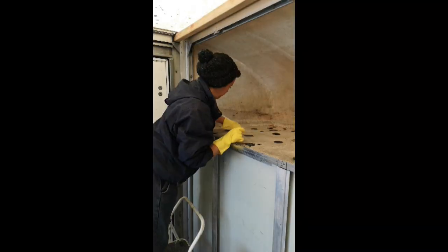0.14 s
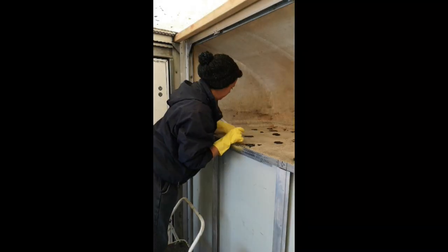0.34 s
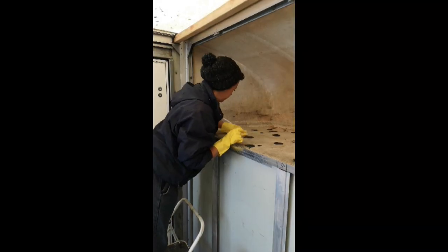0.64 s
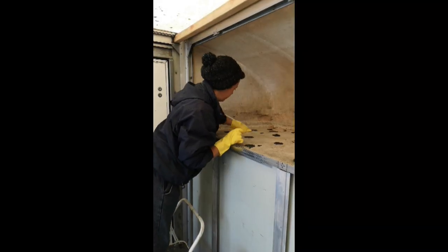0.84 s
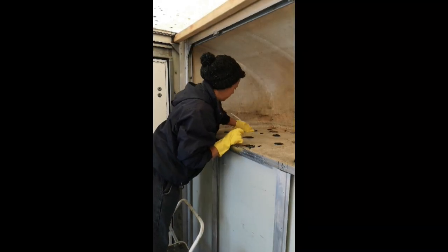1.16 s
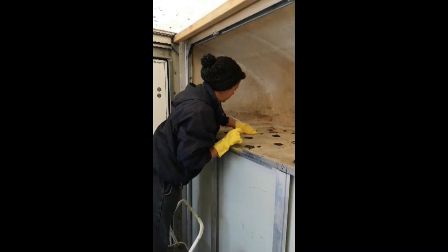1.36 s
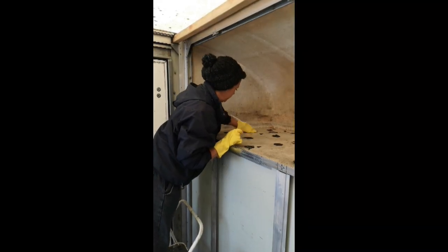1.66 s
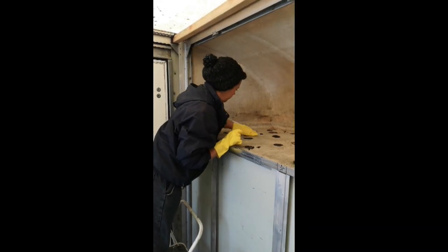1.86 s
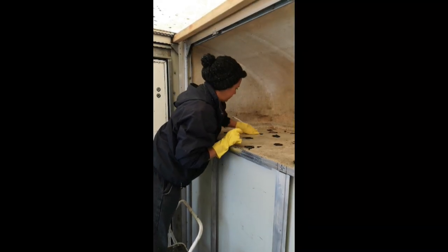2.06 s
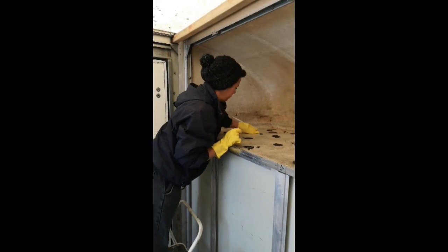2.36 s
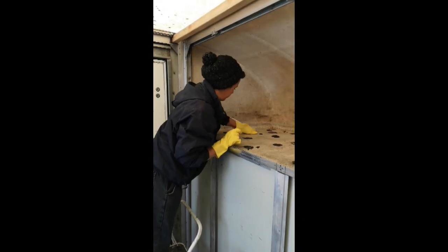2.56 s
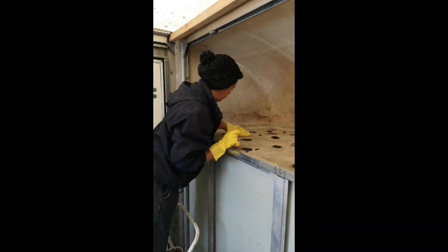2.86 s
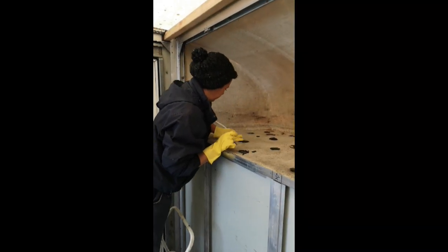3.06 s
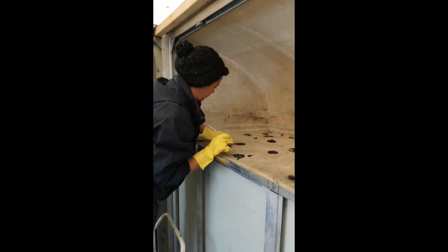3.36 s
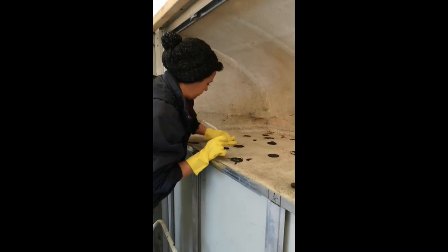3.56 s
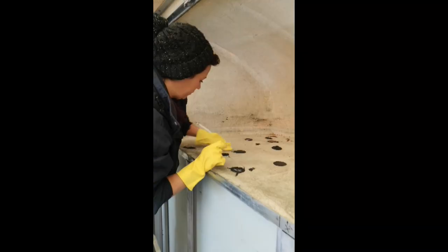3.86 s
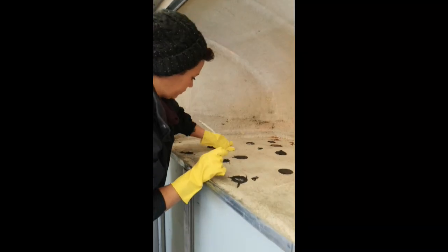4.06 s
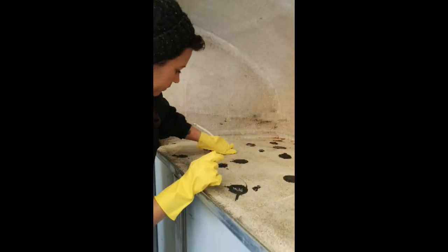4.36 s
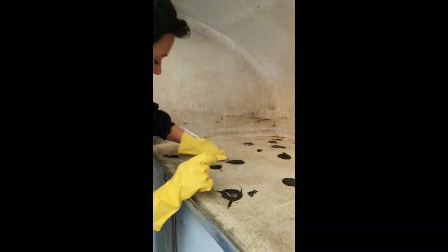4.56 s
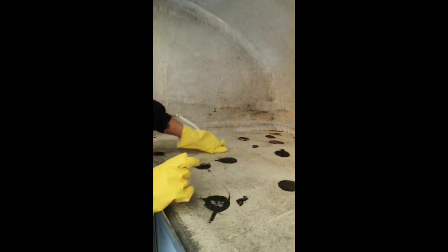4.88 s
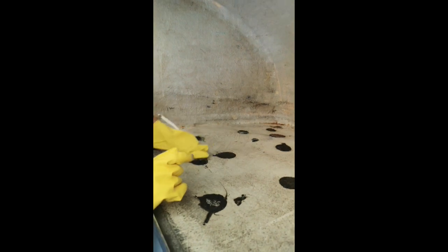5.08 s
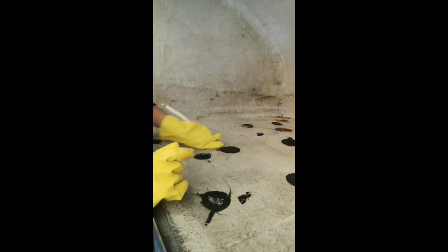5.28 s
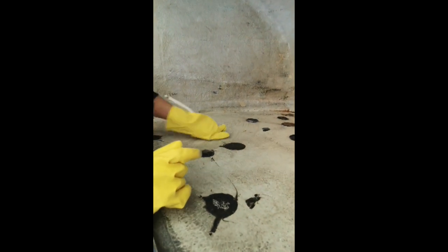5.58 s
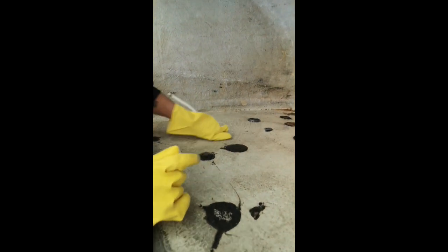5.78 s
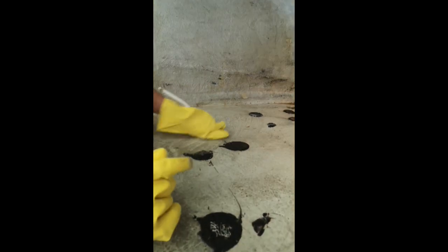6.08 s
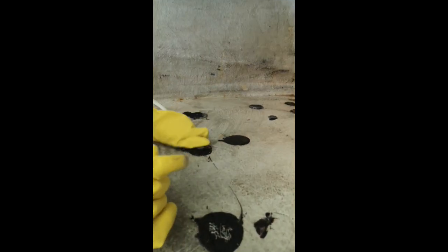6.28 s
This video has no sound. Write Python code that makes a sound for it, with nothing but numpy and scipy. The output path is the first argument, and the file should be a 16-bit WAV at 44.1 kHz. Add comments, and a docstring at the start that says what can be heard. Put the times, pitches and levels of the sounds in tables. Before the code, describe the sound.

Near-silence for about 0.2 s, then brisk scrubbing opens suddenly and runs unbroken to about 6.4 s. A small stiff brush goes back and forth on a hollow fibreglass deck, about seven strokes a second, pushes slightly heavier than pulls, with tiny dips at each turn. The hiss is bright and grainy, with a ringing bristle edge high up and a duller grit rasp below, less gritty around 1.3 s, rougher again from 3 s. The deck booms softly throughout. Coarse scuffs or bumps come near 2.8, 3.5, 4.0 and 4.85 s, the strongest at 5.45 s, another at 6.05 s. From 3 s the handheld microphone moves closer, adding nasal panel tone; the bristles shift from right towards centre. Low handling rumble swells after 4.9 s, jolting around 5.5-5.7 s. Close walls give very short reflections over faint outdoor air.

```python
"""Brush scrubbing a van deck

A gloved hand scrubs a hollow fibreglass deck with a small stiff brush, about seven strokes a second.
Random bristle flicks ring high, grit rasps below, and now and then the brush scuffs harder.
Shaped noise makes the deck's boom, thuds and groans; short decaying echoes make the close walls.
A hand-held camera moves in, with low handling rumble over steady outdoor air.
"""
import sys
import numpy as np
from scipy import signal
from scipy.fft import rfft, irfft, next_fast_len
from scipy.io import wavfile
from scipy.ndimage import uniform_filter1d, map_coordinates

SR = 44100
rng = np.random.default_rng(int(sys.argv[2]) if len(sys.argv) > 2 else 0)


def wav_record(signal):
    """Record a signal, one row per channel, as 16-bit PCM in the file named by sys.argv[1]."""
    frames = np.transpose(np.atleast_2d(signal))
    bounded = np.clip(frames, -1, 1)
    # unit amplitude maps onto the largest positive 16-bit level
    quanta = np.round(bounded * 32767).astype(np.int16)
    wavfile.write(sys.argv[1], SR, quanta)


N = 283695


def amp(db):
    """Decibels to gain."""
    return 10 ** (np.asarray(db) / 20)


def unit(x):
    """Scaled to rms 1."""
    return x / np.sqrt(np.mean(x ** 2) + 1e-20)


def seconds():
    """Time of each sample."""
    return np.arange(N) / SR


def along(points, hz):
    """(frequency, value) points read on a log frequency axis."""
    point_hz, value = np.transpose(points)
    return np.interp(np.log(hz + 1), np.log(point_hz + 1), value)


def curve(rows):
    """(time, value) rows as one value per sample."""
    return np.interp(seconds(), *np.transpose(rows))


def humps(rows):
    """Sum of Gaussian swells; gain falls to exp(-2) one width from the middle."""
    t_s = seconds()
    return sum(amp(db) * np.exp(-2 * ((t_s - middle_s) / width_s) ** 2) for middle_s, width_s, db in rows)


def wobble(knots_per_s):
    """Smooth random curve through normally distributed knots."""
    knots = rng.standard_normal(int(N * knots_per_s / SR) + 4)
    return map_coordinates(knots, [np.arange(N) * knots_per_s / SR])


def filtered(x, response):
    """x times a response of frequency."""
    size = next_fast_len(N + SR // 2)
    spectrum = rfft(x, size) * response(np.fft.rfftfreq(size, 1 / SR))
    return irfft(spectrum, size)[..., :N]


def ring(x, spectrum, size=2048):
    """x through a causal, minimum-phase body with this spectrum, at rms 1."""
    log_gain = np.log(amp(along(spectrum, np.fft.rfftfreq(size, 1 / SR))))
    cepstrum = irfft(log_gain)
    fold = 1 + np.sign(size / 2 - np.arange(size))
    fold[0] = 1
    impulse = irfft(np.exp(rfft(cepstrum * fold)))
    return unit(signal.fftconvolve(x, impulse[None], axes=1)[:, :N])


# Left-right correlation of broad noise: (frequency [Hz], correlation [0-1])
STEREO_LIKENESS = [(60, .99), (130, 0.98), (290, .85), (640, 0.92), (1400, 0.22), (4000, 0.46),
                   (15000, .05)]


def rush(spectrum):
    """Stereo noise of rms 1: mid and side shares set the correlation, nearly mono in the bass."""
    def mid_side_gain(hz):
        angle = np.arccos(along(STEREO_LIKENESS, hz)) / 2
        return amp(along(spectrum, hz)) * np.array([np.cos(angle), np.sin(angle)])

    mid, side = filtered(rng.standard_normal((2, N)), mid_side_gain)
    return unit(np.array([mid + side, mid - side]))


def flicks(rate_hz, alike):
    """Random stereo impulses of steady mean power; a share `alike` is forced to the same sign."""
    chance = rate_hz / SR
    signs = rng.choice([-1, 1], (2, N))
    signs = np.where(rng.random(N) < alike, signs[0], signs)
    return (rng.random(N) < chance) * signs / np.sqrt(chance)


def patchy(x, depth_db):
    """Slow random hills in the spectrum, a few hundred Hz wide, as the contact patch moves; rms 1."""
    bins = signal.stft(x, nperseg=512)[2]
    field = rng.standard_normal(bins.shape[1:])
    field = uniform_filter1d(uniform_filter1d(field, size=4, axis=0), size=12, axis=1)
    return unit(signal.istft(bins * amp(depth_db * unit(field)), nperseg=512)[1][:, :N])


# Outdoor air spectrum: (frequency [Hz], relative level [dB])
AIR_SPECTRUM = [(30, -6), (150, -6.5), (300, -3), (600, -5.5), (760, -2.5), (900, 0.5), (1080, -5),
                (1400, -7), (2200, -11), (6000, -19), (15000, -42)]


def air():
    """Steady outdoor air: stationary shaped noise."""
    return amp(-48) * rush(AIR_SPECTRUM)


# Handling rumble: (time [s], level [dB])
HANDLING_LEVEL = [(.3, -39), (1.5, -38), (2.3, -42), (3.2, -40), (4.9, -31.5), (5.3, -33), (6.15, -29.5),
                  (6.43, -35)]
# Grip shifts on the camera: (middle [s], width [s], level [dB])
GRIP_JOLTS = [(5.535, .06, -23), (5.68, .035, -25)]
# Handling spectrum: (frequency [Hz], relative level [dB])
HANDLING_SPECTRUM = [(10, -13), (25, -4), (46, -3.5), (66, -6.5), (88, -8), (120, -16), (250, -37.5),
                     (800, -66)]


def handling():
    """Low noise of the hand on the camera, swelling briefly where the grip shifts."""
    return (amp(curve(HANDLING_LEVEL)) + humps(GRIP_JOLTS)) * rush(HANDLING_SPECTRUM)


# Body weight leaning on the deck: (middle [s], width [s], level [dB])
DECK_LEANS = [(.48, .14, -38), (1.09, .06, -43), (1.38, .09, -42), (1.99, .15, -42), (2.45, .15, -41),
              (3.52, .16, -37.5), (4.05, .14, -35.5), (4.87, .06, -40), (5.51, .1, -34), (6.09, .07, -37)]
# Hollow deck spectrum: (frequency [Hz], relative level [dB])
DECK_SPECTRUM = [(50, -43), (90, 1), (118, 1), (142, -6), (168, -4), (203, -17), (238, -9), (272, -19),
                 (308, -12.5), (430, -20), (700, -26.5), (1500, -26.5)]
BOOM_DB, BOOM_PUSH_DB, BOOM_DRIFT_DB = -42.5, .8, .8  # base, swing with the arm, slow chance


def deck_boom(swing):
    """The hollow deck booms unevenly, more under each push or lean."""
    level_db = BOOM_DB + BOOM_PUSH_DB * swing + BOOM_DRIFT_DB * wobble(5)
    uneven = unit(rush(DECK_SPECTRUM) * amp(0.88 * wobble(25)))
    return (amp(level_db) + humps(DECK_LEANS)) * uneven


# One row per back-and-forth of the arm: (push start [s], pull start [s])
ARM_STROKES = [(.04, .176), (.314, .49), (.65, .793), (.938, 1.076), (1.222, 1.376), (1.516, 1.653),
               (1.775, 1.925), (2.063, 2.235), (2.382, 2.56), (2.702, 2.881), (3.018, 3.173),
               (3.303, 3.462), (3.59, 3.733), (3.875, 4.034), (4.18, 4.319), (4.459, 4.607), (4.744, 4.879),
               (5.032, 5.182), (5.325, 5.495), (5.648, 5.783), (5.923, 6.076), (6.232, 6.38)]
# How hard the arm bears down: (time [s], relative level [dB])
ARM_EFFORT = [(.2, -26.5), (.4, -21.8), (1.4, -22.7), (2.5, -21.7), (3.65, -24), (4.3, -21.8), (5.1, -22),
              (5.45, -19), (5.8, -19.6), (6.3, -18.2)]
PUSH_DB, PULL_DB = 1.0, -1.1  # a push is heavier than a pull
PUSH_PEAK, PULL_PEAK = .51, .45  # share of the stroke before top speed
LAST_PULL_S = .14


def arm():
    """Brush speed 0-1, pressure dB and swing (+1 mid-push, -1 mid-pull): the hand stops at each turn."""
    t_s = seconds()
    start_s = np.ravel(ARM_STROKES)
    pushing = np.arange(len(start_s)) % 2 == 0
    length_s = np.append(np.diff(start_s), LAST_PULL_S)
    fastest_s = start_s + np.where(pushing, PUSH_PEAK, PULL_PEAK) * length_s

    # quarter-turns of phase: turn, top speed, turn, ...
    marks_s = np.append(np.column_stack([start_s, fastest_s]), start_s[-1] + length_s[-1])
    swing = np.sin(np.interp(t_s, marks_s, np.arange(len(marks_s)) * np.pi / 2))

    stroke_db = np.interp(fastest_s, *np.transpose(ARM_EFFORT)) + np.where(pushing, PUSH_DB, PULL_DB)
    stroke = np.clip(np.searchsorted(start_s, t_s) - 1, 0, None)
    press_db = uniform_filter1d(stroke_db[stroke], size=1300)
    return np.abs(swing), press_db, swing


# Bristle ring spectrum: (frequency [Hz], relative level [dB])
BRISTLE_SPECTRUM = [(1500, -53), (3500, -24), (6000, -15.5), (7000, -9), (7700, -4), (8170, -1.5),
                    (8700, -4), (9400, -9.5), (10500, -14), (12500, -21.5), (15800, -24)]
# Fine fizz spectrum: (frequency [Hz], relative level [dB])
FIZZ_SPECTRUM = [(2000, -32), (5000, -8), (9000, 0), (12000, 2), (15800, -.5)]


def bristles(speed, press_db, near):
    """Bristles flick free in tufts: speed gives more and louder ticks, and a fine fizz."""
    tufts = amp(1.55 * wobble(650) + .3 * wobble(130) + .6 * wobble(45))
    grip = np.tanh(1.44 * speed ** 1.82)  # friction levels off once the bristles skate
    ticks = ring(tufts * flicks(4000 + 8000 * speed, alike=.06), BRISTLE_SPECTRUM)
    ticks = ticks * (0.15 + 0.83 * grip)
    fizz = ring(tufts * flicks(12000, alike=.03), FIZZ_SPECTRUM) * amp(-12.5) * speed ** 2.0
    left_minus_right_db = -1.7 + 2.6 * near  # from the right to just past the middle
    return (ticks + fizz) * amp(press_db + 0.2 + np.outer([.5, -.5], left_minus_right_db))


# Grit scrape spectrum: (frequency [Hz], relative level [dB])
RASP_SPECTRUM = [(200, -17), (600, -7.5), (900, -5.5), (1400, -3), (2200, -3), (3400, 2), (5200, 1),
                 (7500, -4.5), (15000, -22)]
# Nasal panel ring spectrum: (frequency [Hz], relative level [dB])
PANEL_SPECTRUM = [(500, -27), (900, -6), (1150, -11), (1320, 1), (1480, -1), (1700, -6), (2100, -17),
                  (5000, -41)]


def rasp(speed, press_db, rasp_db, near):
    """Tips drag over grit, a duller scrape; closeness brings in the panel's own nasal ring."""
    drag = amp(1.2 * wobble(350)) * flicks(5000 + 6000 * speed, alike=0.25)
    grit = patchy(ring(drag, RASP_SPECTRUM), depth_db=2.0) * amp(press_db + rasp_db - 11)
    panel = patchy(ring(flicks(3000, alike=0.22), PANEL_SPECTRUM), depth_db=3.5)
    panel = panel * near * amp(press_db - 28)
    return (grit + panel) * (0.19 + 0.81 * np.tanh(1.7 * speed ** 1.35))


# Decay time inside the van: (frequency [Hz], t60 [s])
VAN_DECAY = [(200, 0.5), (2000, 0.11), (8000, 0.12), (15000, 0.13)]


def walls():
    """Short stereo noise tail of unit energy; each frequency dies at its own speed."""
    hz, t_s, bins = signal.stft(rng.standard_normal((2, SR // 4)), SR, nperseg=256)
    decay = amp(-60 * t_s / along(VAN_DECAY, hz)[:, None])
    tail = signal.istft(bins * decay, SR, nperseg=256)[1]
    # silent for 3 ms, full by 6 ms
    tail = tail * np.clip(np.arange(tail.shape[1]) / SR / .003 - 1, 0, 1)
    return tail / np.linalg.norm(tail, axis=1, keepdims=True)


def van(x, count=24):
    """The walls' answer: overlapping tails give a pattern that drifts as hand and camera move."""
    place = np.linspace(0, count - 1, N)
    out = np.zeros((2, N + SR))
    for k in range(count):
        span = np.flatnonzero(np.abs(place - k) < 1)
        fade = np.cos((place[span] - k) * np.pi / 2)
        echo = signal.fftconvolve(x[:, span] * fade, walls(), axes=1)
        out[:, span[0]:span[0] + echo.shape[1]] += echo
    return out[:, :N]


# The brush digs in: (middle [s], width [s], relative level [dB])
DIG_INS = [(0.42, 0.026, -41), (2.10, 0.054, -42.5), (2.825, .03, -35.5), (3.4, 0.035, -42),
           (4.848, 0.027, -38), (5.435, 0.017, -30), (5.538, 0.044, -37), (6.04, 0.024, -34.5)]
# Scuff spectrum: (frequency [Hz], relative level [dB])
SCUFF_SPECTRUM = [(150, -7), (400, -3), (850, -1.5), (1450, 1), (2200, -3.5), (4000, -6), (9000, -52)]


def scuffs():
    """Short coarse judders where the brush digs in."""
    return humps(DIG_INS) * ring(flicks(2500, alike=0.61), SCUFF_SPECTRUM)


# Arms bump and rub the deck: (start [s], decay [s], thud [dB], hollow groan [dB])
DECK_BUMPS = [(2.822, 0.058, -36, -45), (3.098, .04, -38, -46), (3.489, .12, -40, -37),
              (3.977, 0.055, -31, -40), (4.059, 0.08, -38, -37.5), (4.245, 0.085, -44, -43),
              (5.459, 0.084, -28.5, -42.5), (5.55, 0.064, -35, -40), (6.044, .09, -37, -42)]
# Thud spectrum: (frequency [Hz], relative level [dB])
THUD_SPECTRUM = [(40, -11), (85, 6.5), (175, 0), (215, -6.5), (300, -9), (420, -17), (500, -9.5),
                 (800, -19.5), (2500, -36)]
# Groan spectrum: (frequency [Hz], relative level [dB])
GROAN_SPECTRUM = [(120, -25), (200, -10), (245, -0.5), (275, -3), (310, 0), (360, -3.5), (420, -16),
                  (800, -35)]


def deck_bumps():
    """The deck shudders when the arms bump or rub it: quick rise, Gaussian decay."""
    t_s = seconds()
    thud, groan = np.zeros((2, N))
    for start_s, decay_s, thud_db, groan_db in DECK_BUMPS:
        age_s = np.maximum(t_s - start_s, 0)
        shudder = (1 - np.exp(-age_s / 0.0043)) * np.exp(-(age_s / decay_s) ** 2)
        thud += amp(thud_db) * shudder
        groan += amp(groan_db) * shudder
    return thud * rush(THUD_SPECTRUM) + groan * rush(GROAN_SPECTRUM)


# Camera approach: (time [s], closeness [0-1])
CLOSENESS = [(0, 0), (3.0, 0.2), (4.6, 0.6), (5.6, 0.8), (6.43, 1)]
# Rasp of the grit under the brush: (time [s], relative level [dB])
GRIT_LEVEL = [(.25, -1.5), (1.3, -6), (2.7, -4.3), (3.0, -1.1), (5.15, -1), (5.5, -4.1)]


def scene():
    """The brush and its wall echoes over the deck, handling rumble and air."""
    speed, press_db, swing = arm()
    near = curve(CLOSENESS)
    brush = bristles(speed, press_db, near) + rasp(speed, press_db, curve(GRIT_LEVEL), near) + scuffs()
    inside = amp(-0.55) * brush + amp(-5) * van(brush)
    return inside + deck_boom(swing) + deck_bumps() + handling() + air()


# Stereo balance: (frequency [Hz], left minus right [dB])
STEREO_BALANCE = [(60, -1.2), (1000, -.8), (2000, -1.6), (4400, 0.5), (7000, 0.8), (8400, -5.5),
                  (9800, -2.7), (11500, -1.5), (15000, -1.5)]
OPEN_S, TOP_HZ = .188, 15780  # onset of full level, band limit


def record(dry):
    """The camera opens from -60 dB over 4 ms, leans the top hiss right and cuts above its band limit."""
    opened = np.clip((seconds() - OPEN_S) / .004, 0, 1)
    leaning = filtered(dry, lambda hz: amp(np.outer([.5, -.5], along(STEREO_BALANCE, hz))))
    return filtered(leaning * np.maximum(opened, amp(-60)), lambda hz: hz < TOP_HZ)


dry = scene()
out = record(dry)
wav_record(out)
```